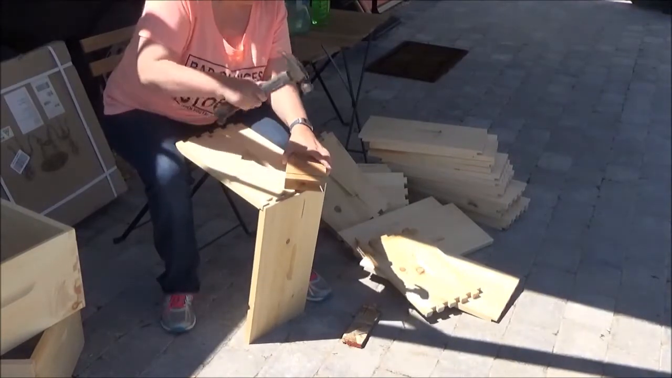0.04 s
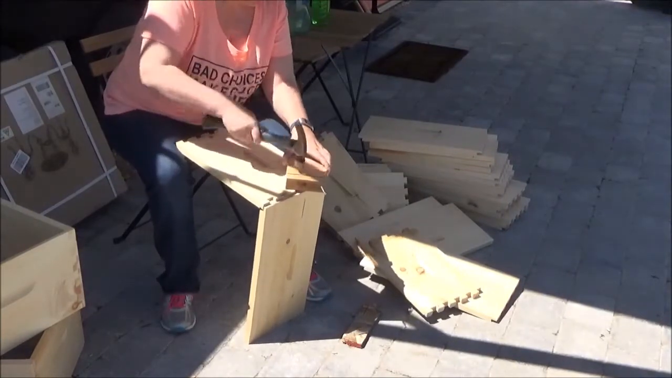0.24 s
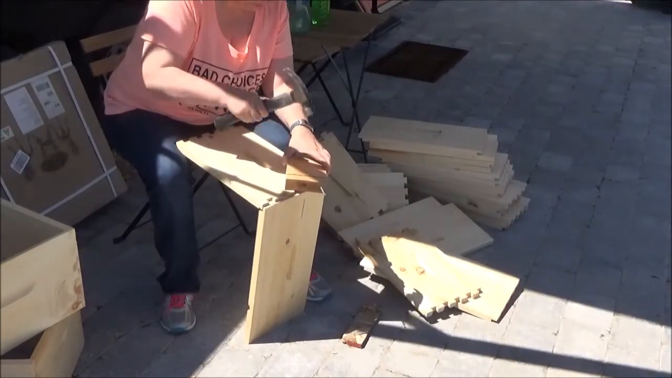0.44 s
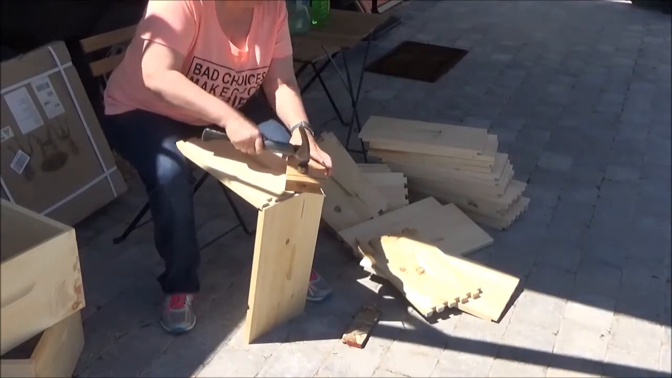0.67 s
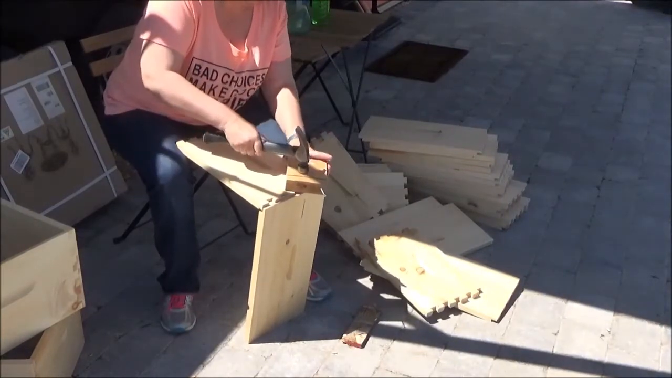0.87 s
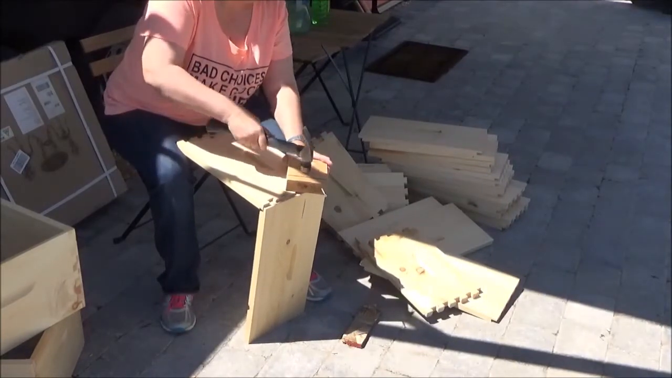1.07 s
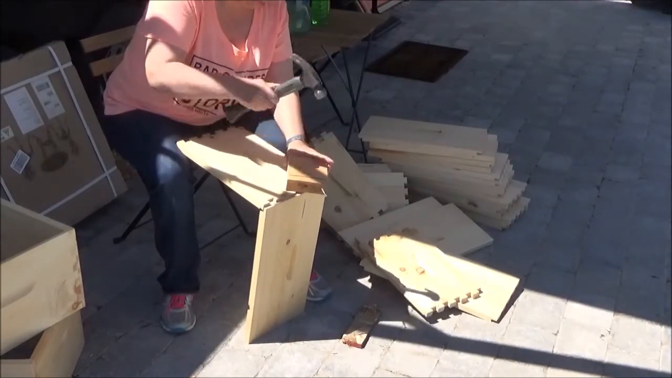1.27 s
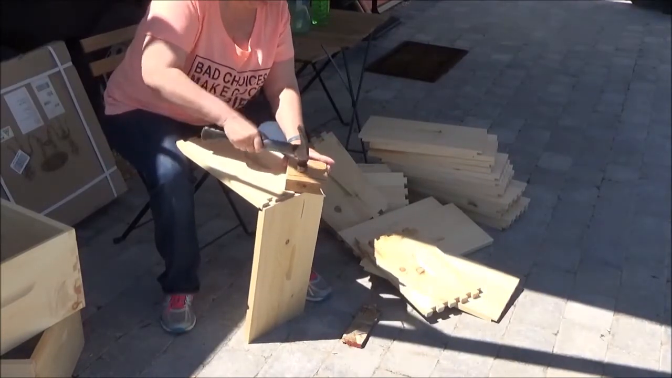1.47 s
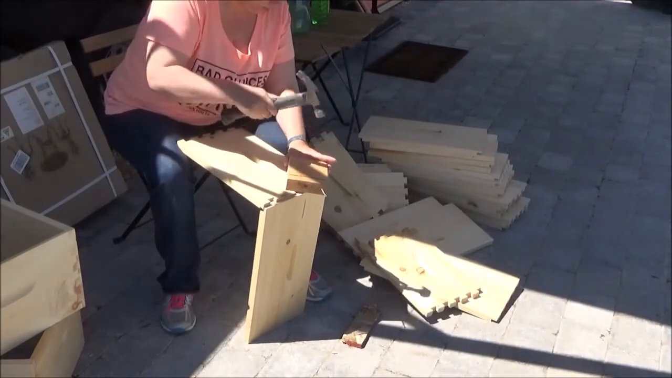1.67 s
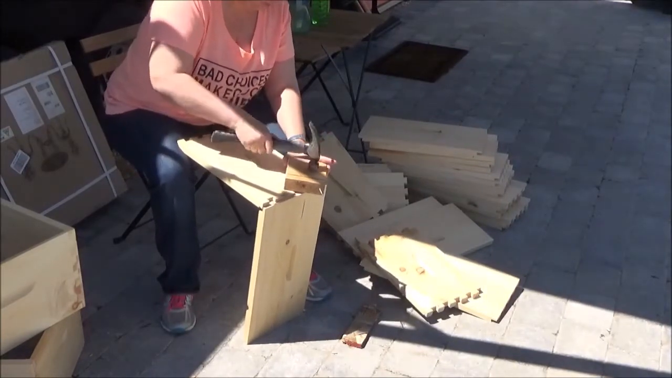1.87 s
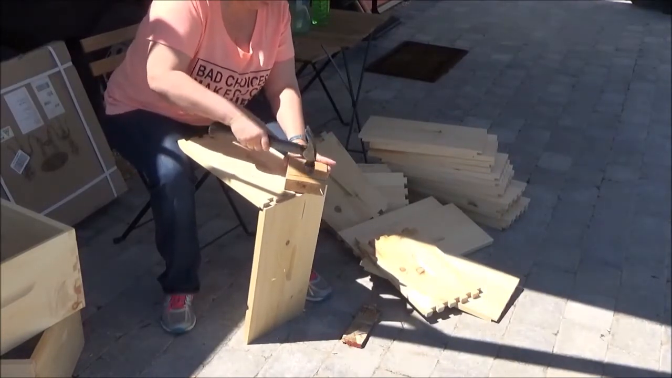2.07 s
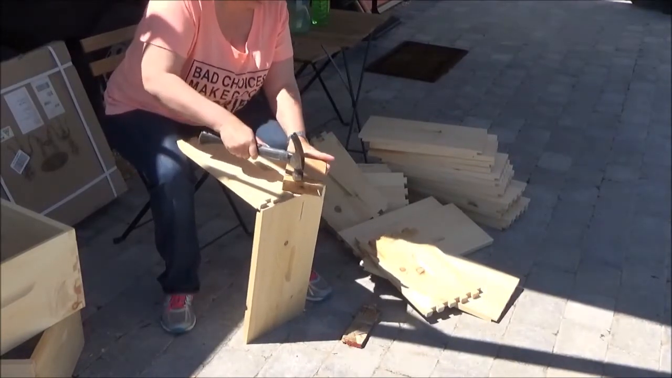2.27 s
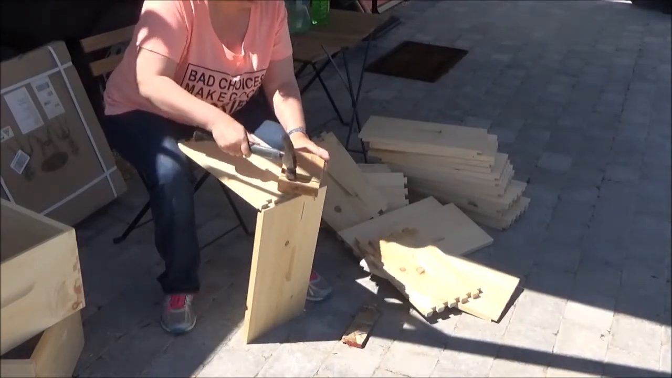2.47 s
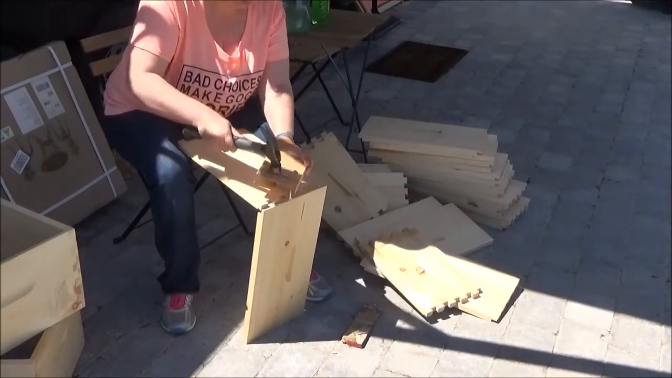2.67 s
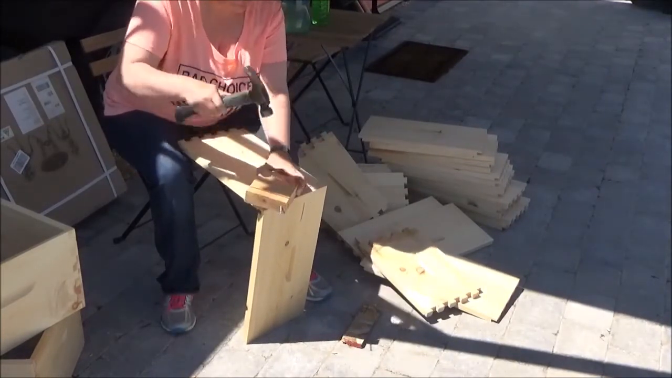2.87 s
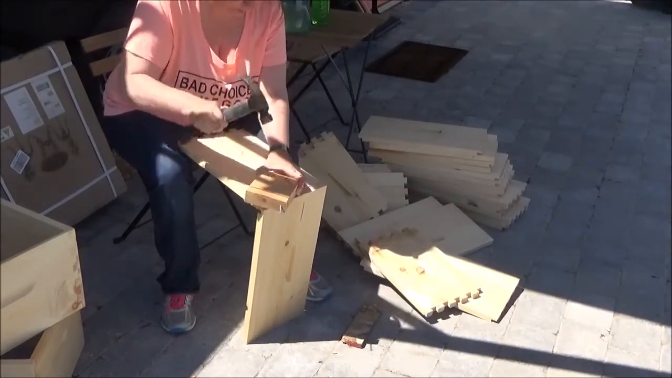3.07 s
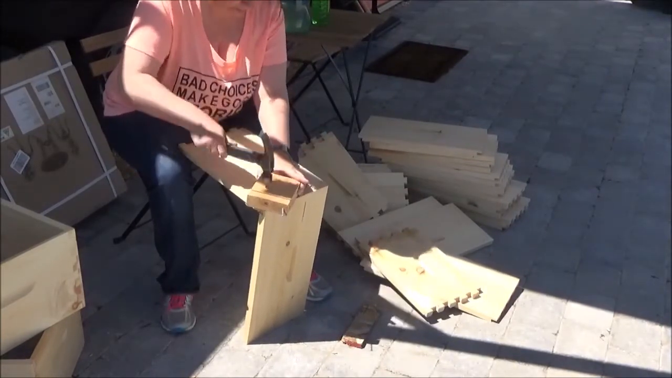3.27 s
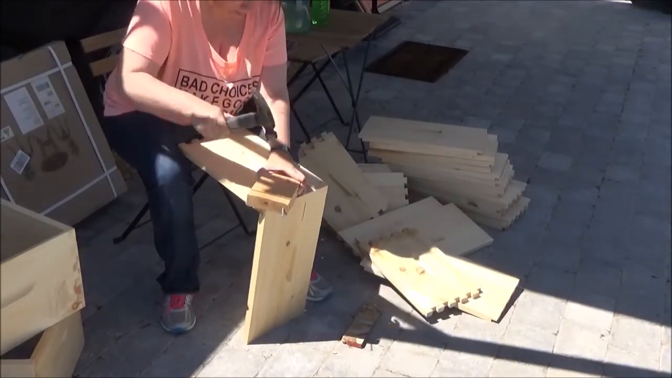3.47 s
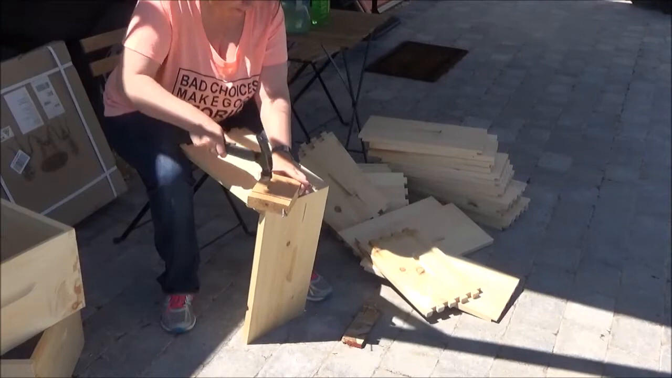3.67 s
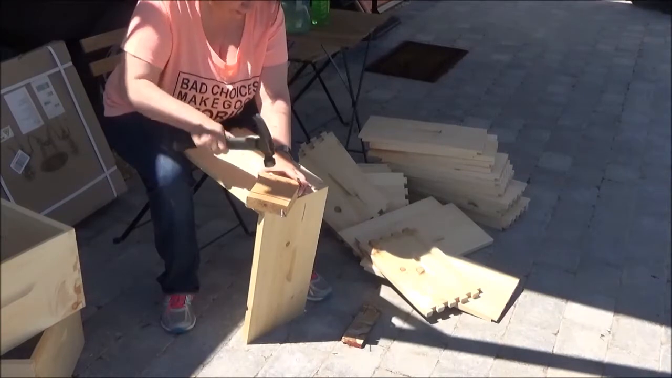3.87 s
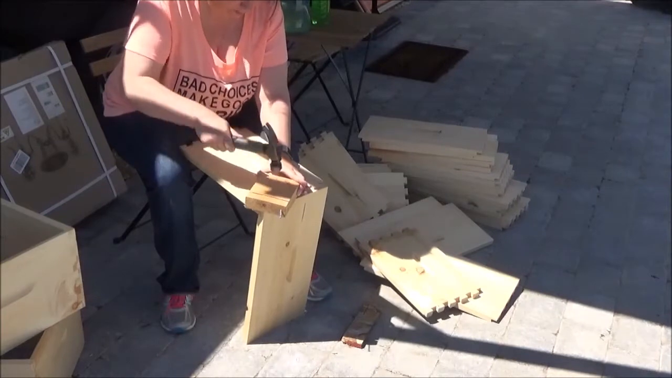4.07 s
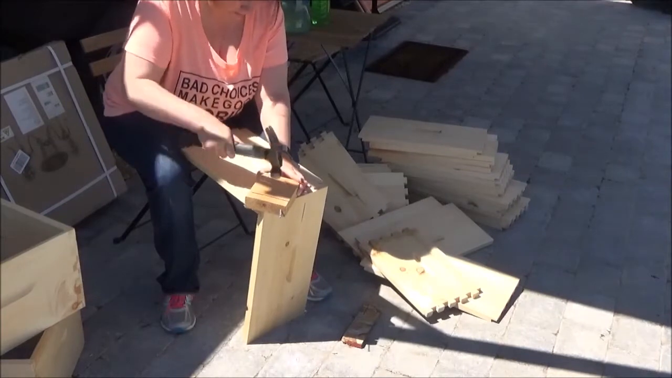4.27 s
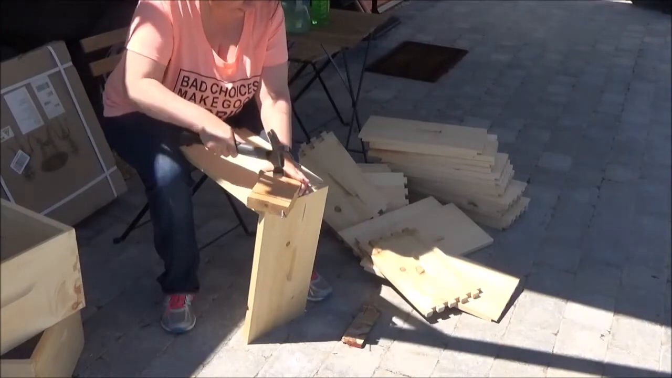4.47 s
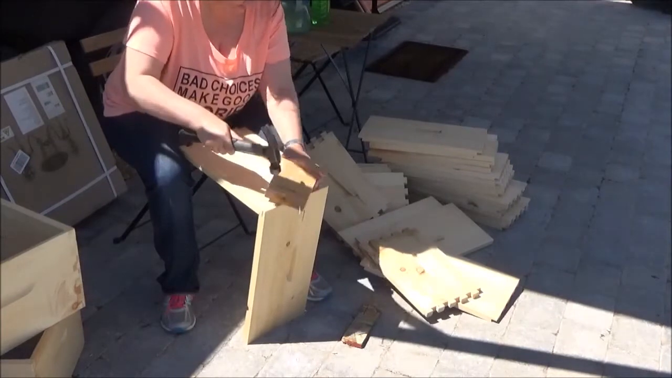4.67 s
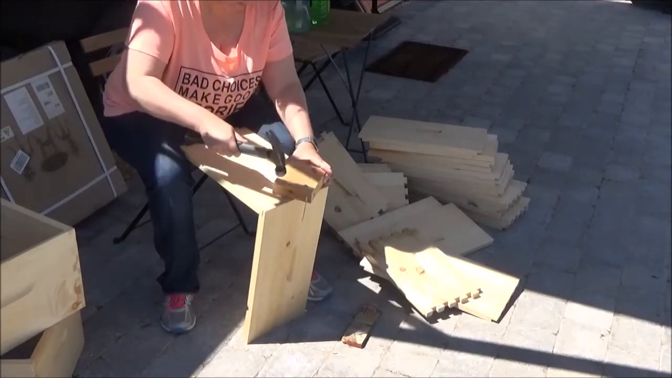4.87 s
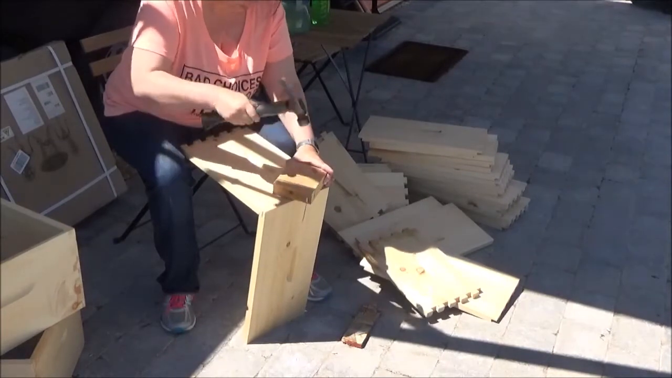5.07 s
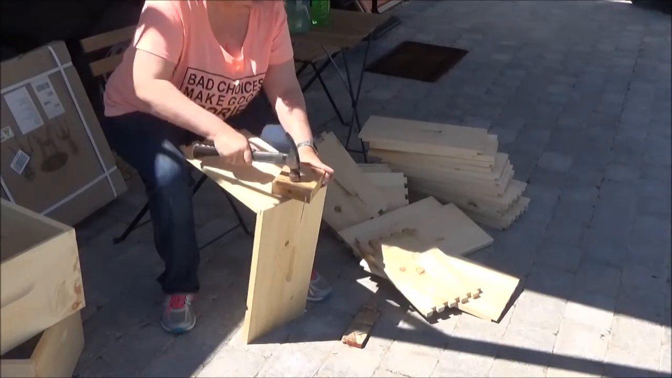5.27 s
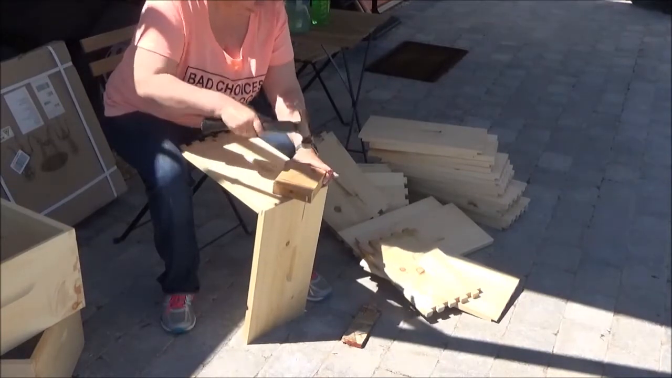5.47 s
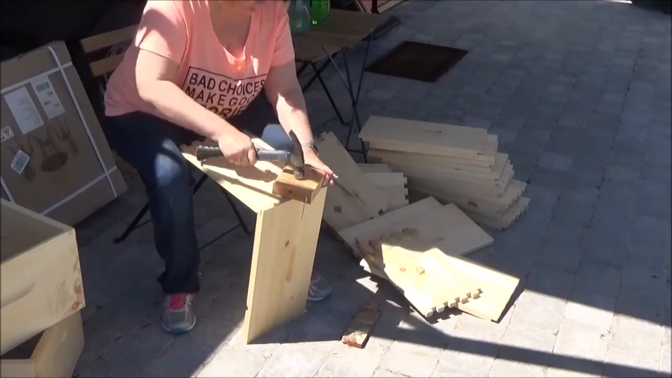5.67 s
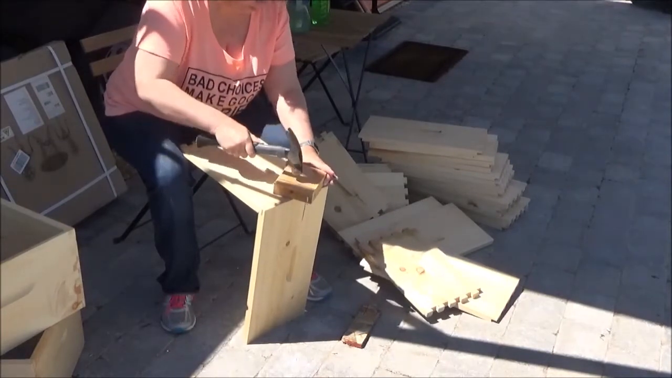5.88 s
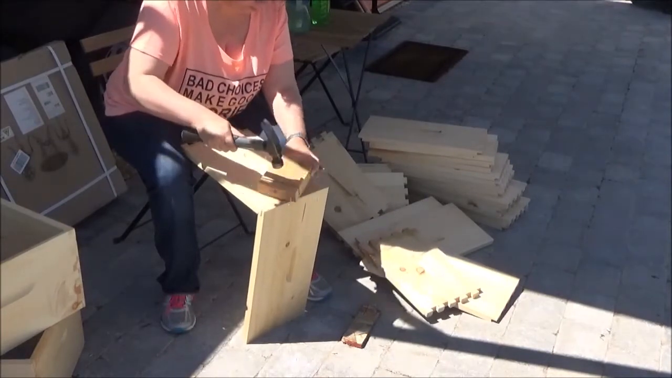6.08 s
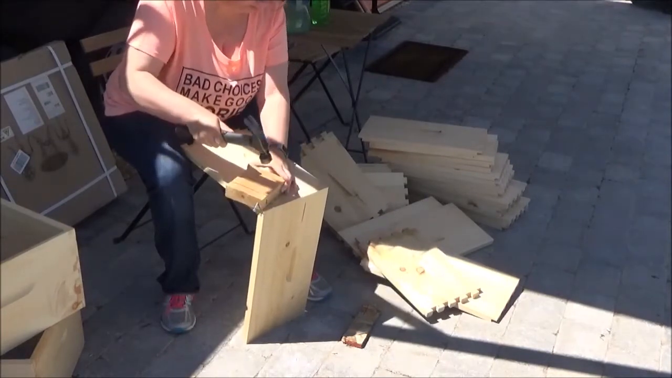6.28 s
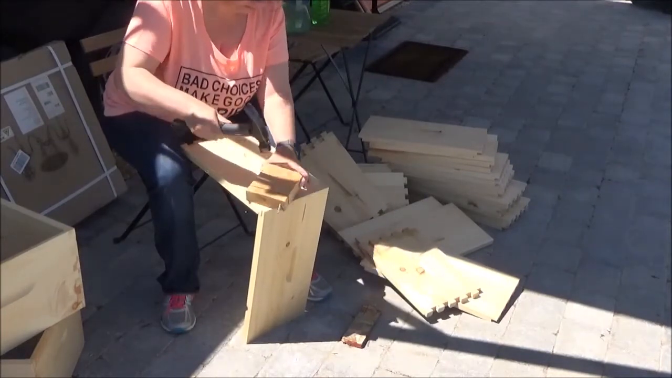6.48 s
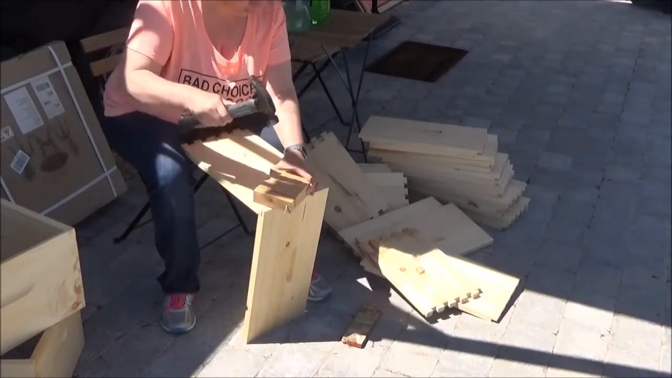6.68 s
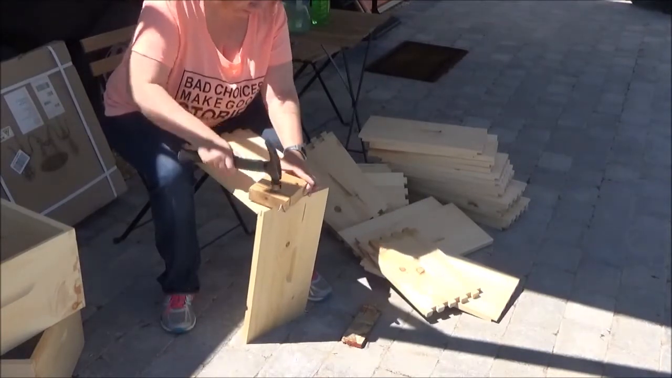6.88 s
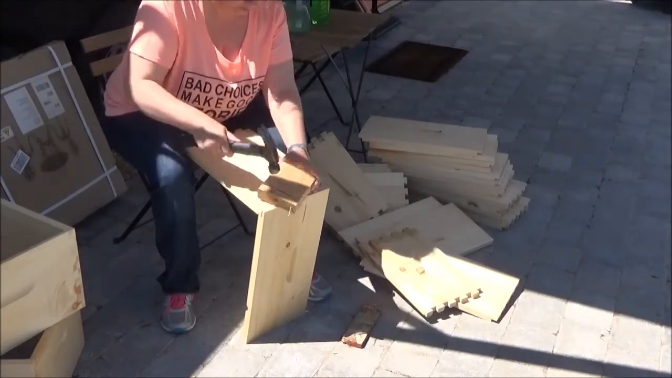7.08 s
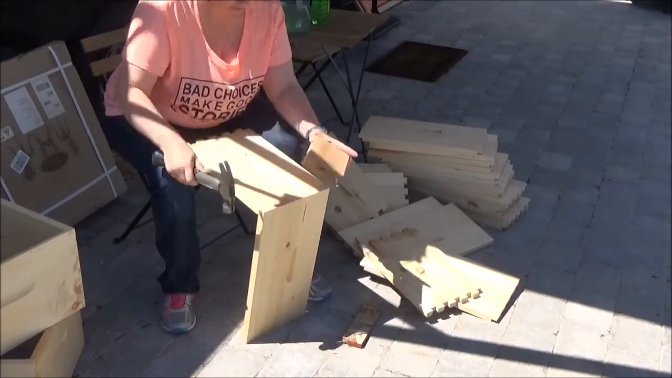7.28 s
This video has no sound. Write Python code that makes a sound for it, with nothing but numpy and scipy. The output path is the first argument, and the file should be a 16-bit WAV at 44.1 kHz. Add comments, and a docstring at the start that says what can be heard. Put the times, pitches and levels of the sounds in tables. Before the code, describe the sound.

Soft outdoor hush with a faint low hum runs steadily underneath. Hard steel hammer blows through a wooden block hit at 0.14 and 0.53 s, then 1.43 and 1.83 s, each a sharp crack with a short hollow wooden knock. Small block taps follow around 2.0 to 2.2 s. At 2.86 s the block clacks down loudly with a quick bounce. Four evenly spaced blows come at 3.15, 3.56, 3.93 and 4.32 s, with brighter wood pitch. The block taps down at 4.85 s, rubs faintly at 5.14 s, then blows land at 5.28 and, duller and weaker, 5.68 s. Quiet dry scrapes and tiny ticks occur from 6.17 to 6.54 s. A last strong blow at 6.86 s is followed by light clacks at 6.92 and 7.04 s, fading into hush by about 7.3 s. Knocks have a brief room ring and faint late yard echo.

```python
"""In the open door of a workshop, a steel hammer drives wooden box joints home through a hand-held block.
Each knock sums ringing modes of the wood and a broad crack; the block is also set down, bounces and slides.
The shop rings briefly as fading noise, single walls echo, and walls across the yard answer late.
Friction noise makes the slides, shaped noise and a low hum make a soft outdoor hush,
and a fast limiter holds down the loud peaks."""
import sys
import numpy as np
from scipy import signal
from scipy.fft import rfft, irfft, next_fast_len
from scipy.io import wavfile
from scipy.ndimage import uniform_filter1d, minimum_filter1d

SR = 44100
rng = np.random.default_rng(int(sys.argv[2]) if len(sys.argv) > 2 else 0)


def gain_from_db(level_db):
    """Convert decibel levels to linear amplitude factors (20 dB per decade)."""
    decades = np.asarray(level_db, float) / 20
    return 10 ** decades


def wav_out(sig):
    """Save sig, one row per channel (or a flat mono array), as 16-bit PCM at SR to the path in sys.argv[1]."""
    wavfile.write(sys.argv[1], SR, np.round(np.clip(np.atleast_2d(sig).T, -1, 1) * 32767).astype(np.int16))


N = 323686

# Hammer blows. Each row: start in seconds, level in dB before the hammer's overall gain, side panel against
# the top board in dB before the panel offsets, ring favoured by the struck spot in Hz, crack in dB.
BLOWS = [(0.140, -9, -30, 850, -10.5), (0.532, -6, -34.5, 940, -5.5), (1.433, -6, -34, 750, -8),
         (1.83, -8, -34.5, 620, -10.5), (3.151, -8.5, -32.5, 1220, -10), (3.556, -10.5, -33, 1230, -13),
         (3.929, -7.5, -33.5, 1230, -11.5), (4.316, -9, -30.5, 1560, -8), (5.282, -8.5, -32, 1570, -4),
         (5.676, -13.5, -28.5, 438, -6.5), (6.857, -6.5, -33.5, 1430, -11)]
# The block set down or bouncing. Each row: start in seconds, level in dB before the block's overall gain, then
# against the top board: side panel in dB before the panel offsets, block in dB, crack in dB.
TAPS = [(2.031, -26.5, -29.5, -4, -10), (2.191, -2.5, -33, -1.5, -26), (2.213, -12.5, -26.5, -4, -30),
        (2.858, 14, -40.5, -17.5, -18.5), (2.896, -9.5, -24, 10.5, -1), (2.956, -10.5, -34.5, -3, -48),
        (3.134, -35, -25, 12, 7), (4.306, -37, -25, 13, -11), (4.846, -17, -26.5, -3, -35),
        (4.869, 4.5, -50.5, -16.5, -36), (6.209, -40, -9, 9, -19), (6.229, -31, -21, -27, 4),
        (6.254, -38.5, -9, -15, -15), (6.290, -10.5, -51, -28, -28), (6.711, -32, -20.5, -3, -13),
        (6.923, 3, -45, -0.5, -33), (7.041, -20, -37, -15, -8)]
# Where the parts sound, in Hz: three for the side panel, then top board, lower board, block and crack.
PARTS_HZ = [90, 200, 400, 630, 1050, 1900, 4500]
# Modes of box and block. Each row: pitch in Hz, level in dB before the part levels and a random scatter,
# time to fade by 60 dB in seconds before the grip shortens it.
WOOD = [(176.5, 5.5, 0.079), (248.3, -3.5, 0.076), (335, -3, 0.068), (425.5, -16, 0.16), (472, -8.5, 0.074),
        (542.3, -8.5, 0.064), (618.2, -9.5, 0.046), (662, -32, 0.018), (800, -20, 0.13), (942, -7.5, 0.025),
        (1210, -17.5, 0.045), (1420, -8, 0.0088), (1580, -16.5, 0.05), (1792, -19, 0.039),
        (1900, -39, 0.013), (2053, -16, 0.032), (2414, -4, 0.0057), (2987, -5, 0.0086), (3590, -5.5, 0.007)]
# How long the shop rings. Each row: pitch in Hz, time to fade by 60 dB in seconds.
SHOP = [(150, 0.25), (600, 0.21), (2000, 0.22), (5000, 0.25), (10000, .22)]
# Echoes of single walls. Each row: delay in seconds, bass in dB, treble in dB, both before the wet level.
WALLS = [(.012, 2, -43), (.025, -33, -10.5), (0.086, -75, -54), (0.114, -13, -88), (0.146, -40, -30)]
# Colour of the far answer. Each row: pitch in Hz, level in dB before the yard's overall level.
YARD = [(150, -30), (500, -7.5), (1500, -7), (4000, 1), (6000, -10), (10000, -37.5)]
# Slow changes of the hush. Each row: time in seconds, level in dB before the air and hum levels.
HUSH = [(0.0, -53), (0.61, -53), (1.24, -54), (1.84, -52), (2.43, -54.5), (3.27, -52.5), (4.4, -55.5),
        (4.97, -56), (5.64, -54), (5.93, -55), (7.34, -53.5)]
# Colour of the outdoor air. Each row: pitch in Hz, relative level in dB per Hz.
AIR = [(25, 26), (60, 2.5), (130, 9), (300, 6.5), (600, 8.5), (1200, 5), (2500, -0.5), (5000, 0), (8000, 4),
       (11000, -2.5)]
# Where the box is heard. Each row: pitch in Hz, left over right in dB.
LEFT_OF_CENTRE = [(150, -0.3), (350, 0), (1500, 2.5), (5000, .6), (10000, 0.5)]
# How alike the hush is on both sides. Each row: pitch in Hz, left-right likeness (1 is identical).
ALIKE = [(30, 0.93), (80, 0.97), (220, 0.97), (840, 0.75), (3130, 0.56), (11700, 0.68)]
# Microphone colour. Each row: pitch in Hz, gain in dB.
MIC = [(4800, 3.5), (5500, -1.5), (6200, -13.5), (7000, -7), (9000, -10), (10900, -6)]
# Band limits after the limiter. Each row: pitch in Hz, gain in dB.
PASSBAND = [(20, -28), (90, -4), (10900, 0.5), (11300, -28), (12500, -73), (14000, -100)]
# The block dragged over the board. Each row: start in seconds, length in seconds, level in dB before the
# uneven slips, squeal over it in dB, rub over it in dB.
STROKES = [(5.14, 0.086, -59, -12, -12), (6.171, .13, -60, 3, 6), (6.383, 0.157, -57, -0.5, -7)]

PATCHES_DB = 2.5  # random patches, in dB, that make the shop's ring grainy in pitch and time
FAR_END_DB, FAR_END_LONGER = -25.5, 2.15  # the far end of the shop answers weaker and rings longer
BOARD_UNDER_BLOCK_DB = 5  # a light contact reaches the lower board only through the block
STROKE_EDGE_S = 0.023  # time to gain and lose pressure
STRUCK_BOARD_DB, STRUCK_BLOCK_DB = -2.5, 1.43  # lower board and block under the hammer, against the top board
SPOT_LIFT_DB, SPOT_OCTAVES = 5, 0.14  # how much, and how widely, the struck spot favours the modes near it


def hammer():
    """Hard blows: the hand grips the block firmly, which shortens the ring, and the shop is filled more."""
    blows = []
    for s, db, panel_db, spot_hz, crack_db in BLOWS:
        blows.append((s, db, panel_db, STRUCK_BOARD_DB, STRUCK_BLOCK_DB, crack_db, spot_hz, SPOT_LIFT_DB))
    return gain_from_db(9) * contacts(blows, wet_db=0, smear_s=0.035, ring_share=0.8, crack_floor_db=21)


def hand_set_block():
    """Light contacts of the block on the wood: the modes ring freely and the space answers more weakly."""
    taps = []
    for s, db, panel_db, block_db, crack_db in TAPS:
        board_db = block_db - BOARD_UNDER_BLOCK_DB
        taps.append((s, db, panel_db, board_db, block_db, crack_db, PARTS_HZ[3], 0))
    return gain_from_db(-8) * contacts(taps, wet_db=-12, smear_s=0.03, ring_share=1, crack_floor_db=5)


def contacts(rows, wet_db, smear_s, ring_share, crack_floor_db):
    """Places each contact in time, with its own random draw of the space."""
    out = np.zeros((2, N + SR))
    for s, *levels in rows:
        dry_knock = knock(levels, smear_s, ring_share, crack_floor_db)
        heard = signal.fftconvolve(dry_knock[None], space(wet_db), axes=1)
        out[:, round(s * SR):][:, :heard.shape[1]] += heard
    return out[:, :N]


def knock(levels, smear_s, ring_share, crack_floor_db):
    """One contact: the modes stand on a broad crack; a firm grip on the block shortens their ring."""
    db, panel_db, board_db, block_db, crack_db, spot_hz, lift_db = levels
    parts_db = [panel_db - 17.0, panel_db + 0.5, panel_db + 19.0, 0, board_db, block_db, crack_db]
    parts = np.transpose([PARTS_HZ, parts_db])
    f = np.fft.rfftfreq(8192, 1 / SR)
    hz, level_db, t60 = np.transpose(WOOD)[..., None]
    scatter_db = 2.5 * rng.standard_normal(hz.shape)
    # the low panel modes are out of the hand's reach
    life = np.where(hz < PARTS_HZ[3] / 2, 1, ring_share) * t60
    # each fading mode has a resonance peak: the shorter its life, the wider and lower the peak
    strength = (gain_from_db(level_db + scatter_db) * SR / 2) ** 2
    modes = strength / ((np.log(1000) / life) ** 2 + (2 * np.pi * (f - hz)) ** 2)
    power = modes.sum(0) + gain_from_db(crack_floor_db) ** 2
    octaves_away = np.log2((f + 1) / spot_hz)
    spot_db = lift_db * np.exp(-(octaves_away / SPOT_OCTAVES) ** 2 / 2)
    impulse = causal(10 * np.log10(power) + along(parts, f) + spot_db)
    return gain_from_db(db) * np.convolve(impulse, scattered(2048, smear_s))


def causal(gain_db):
    """The shortest impulse with the given spectrum (folded cepstrum)."""
    c = irfft(gain_db * np.log(10) / 20)
    c[1:len(c) // 2] *= 2
    c[len(c) // 2 + 1:] = 0
    return irfft(np.exp(rfft(c)))


def scattered(length, t60):
    """An impulse smeared over some ms, nearly flat in pitch, as bending waves of all speeds leave wood."""
    t = np.arange(length) / SR
    burst = rng.standard_normal(length) * gain_from_db(-60 * t / t60) * (1 - np.exp(-t / 0.0029))
    for _ in range(4):  # flatten the spectrum, keep it short, repeat
        z = rfft(burst)
        burst = irfft(z / np.abs(z)) * (t < t60)
    return burst[t < t60]


def space(wet_db):
    """One stereo impulse response: direct sound, then shop tail, single walls and far yard at wet_db."""
    length = 3 * SR // 4
    hz, t, z = signal.stft(rng.standard_normal((4, length)), SR, nperseg=256)
    patches = uniform_filter1d(rng.standard_normal(z.shape[1:]), size=2, axis=0)  # smooth over pitch
    patches = unit(uniform_filter1d(patches, size=5, axis=1))  # smooth over time
    fall_db = -60 * t / along(SHOP, hz)[:, None]
    near_and_far = gain_from_db(fall_db) + gain_from_db(FAR_END_DB + fall_db / FAR_END_LONGER)
    shop = gain_from_db(-28 + PATCHES_DB * patches) * near_and_far
    late = np.clip(t - 0.24, 0, None)  # the yard swells in after the round trip, then fades
    yard_db = -59.0 + along(YARD, hz)[:, None] - 60 * late / 0.62
    yard = gain_from_db(yard_db) * (1 - np.exp(-late / 0.016))
    shaped = z * np.array([shop, shop, yard, yard])
    tails = signal.istft(shaped, SR, nperseg=256)[1][:, :length]
    response = spread(tails[:2], 0.85) + spread(tails[2:], 0.77)
    for s, bass_db, treble_db in WALLS:
        wall = np.zeros(length)
        face = scattered(1024, 0.016)  # a rough wall smears its echo
        wall[int(s * SR):][:len(face)] = face
        response += filtered(wall, lambda f: gain_from_db(along([(200, bass_db), (6000, treble_db)], f)))
    response *= gain_from_db(wet_db)
    response[:, 0] += 1  # direct sound
    return response


def slide():
    """Stick-slip friction excites two modes of the board in uneven bursts, with a dry hiss."""
    t = np.arange(N) / SR
    slips = gain_from_db(1.6 * unit(uniform_filter1d(rng.standard_normal(N), size=300)))
    squeal, rub, hiss = band(1347, 47), band(604, 50), band(2000, 1650)
    out = np.zeros(N)
    for s, length, db, squeal_db, rub_db in STROKES:
        pressure = np.clip(np.minimum(t - s, s + length - t) / STROKE_EDGE_S, 0, 1)
        friction = gain_from_db(squeal_db) * squeal + gain_from_db(rub_db) * rub + hiss
        out += gain_from_db(db) * pressure * friction
    return slips * out


def hush():
    """Far traffic and air as shaped noise, with a wavering hum near 100 Hz made of very narrow noise."""
    hz, _, z = signal.stft(rng.standard_normal((2, N)), SR, nperseg=1024)
    z = spread(z * gain_from_db(along(AIR, hz))[:, None], along(ALIKE, hz)[:, None])
    air = unit(signal.istft(z, SR, nperseg=1024)[1][:, :N])
    hum = band(96.3, 2.2)
    level_db = np.interp(np.arange(N) / SR, *np.transpose(HUSH))
    return gain_from_db(level_db) * (gain_from_db(7.0) * air + gain_from_db(-11.0) * hum)


def band(centre_hz, width_hz):
    """Noise of rms 1 in one resonance."""
    noise = rng.standard_normal(N)
    return unit(filtered(noise, lambda f: 1 / (1 + ((f - centre_hz) / width_hz) ** 2)))


def spread(pair, alike):
    """Two unrelated signals mixed into left and right of the given likeness."""
    turn = np.arccos(np.clip(alike, -1, 1)) / 2
    middle, side = np.cos(turn) * pair[0], np.sin(turn) * pair[1]
    return np.array([middle + side, middle - side])


def filtered(x, response):
    """Multiplies the spectrum of x by a response, given as a function of frequency in Hz."""
    m = next_fast_len(x.shape[-1] + 8192)
    spectrum = rfft(x, m) * response(np.fft.rfftfreq(m, 1 / SR))
    return irfft(spectrum, m)[..., :x.shape[-1]]


def along(points, hz):
    """Reads a curve of (Hz, value) points on a log frequency axis."""
    f, v = np.transpose(points)
    return np.interp(np.log(hz + 1), np.log(f + 1), v)


def unit(x):
    """Scaled to rms 1."""
    return x / np.sqrt(np.mean(x ** 2) + 1e-20)


def scene():
    """Hammer, block and slide share one place left to right; the hush lies around them."""
    def pan(f):
        left_over_right_db = along(LEFT_OF_CENTRE, f)
        return gain_from_db([left_over_right_db / 2, -left_over_right_db / 2])

    work = hammer() + hand_set_block() + slide()
    return filtered(work, pan) + hush()


def limited(x, top_db, release_db_s, ratio, look_s):
    """Gain falls just ahead of a peak above top_db and recovers at a steady rate in dB."""
    peak_db = 20 * np.log10(np.abs(x).max(0) + 1e-9)
    over_db = np.clip(peak_db - top_db, 0, None) * ratio
    ramp_db = release_db_s * np.arange(N) / SR
    cut_db = np.maximum.accumulate(over_db + ramp_db) - ramp_db
    reach = int(look_s * SR)
    return x * gain_from_db(uniform_filter1d(minimum_filter1d(-cut_db, reach), reach))


def roll_off(x):
    """The treble ends steeply here."""
    return signal.sosfilt(signal.butter(12, 12300, fs=SR, output="sos"), x)


def record(dry):
    """Microphone colour, limiter, soft clipping of what slips through, then band limits."""
    x = filtered(dry, lambda f: gain_from_db(along(MIC, f)))
    x = limited(x, top_db=-14.0, release_db_s=452, ratio=0.75, look_s=0.00015)
    x = x / (1 + np.abs(x / 0.6) ** 4) ** (1 / 4)  # bends smoothly towards a ceiling of 0.6
    mix = filtered(x, lambda f: gain_from_db(along(PASSBAND, f)))
    return roll_off(mix)


dry = scene()
out = record(dry)
wav_out(out)
```